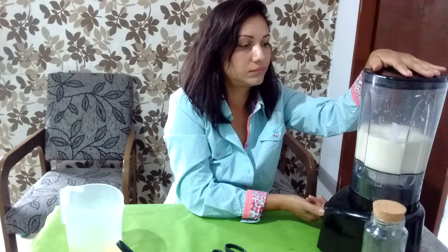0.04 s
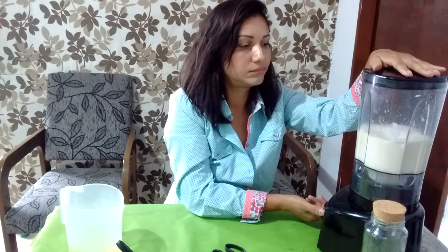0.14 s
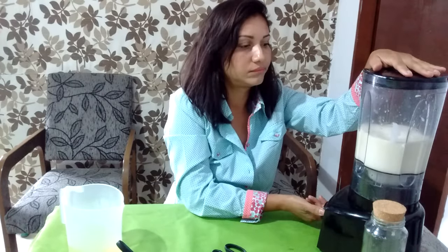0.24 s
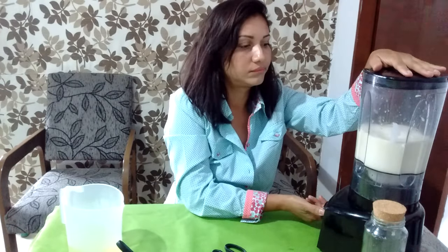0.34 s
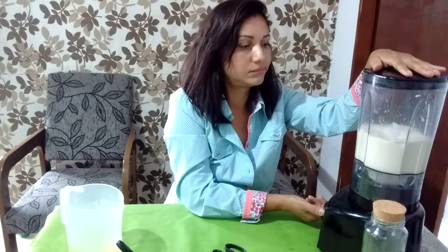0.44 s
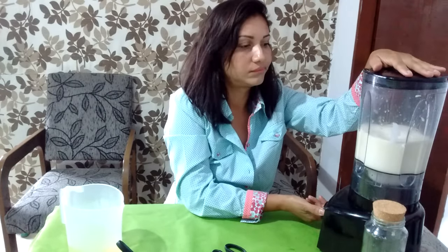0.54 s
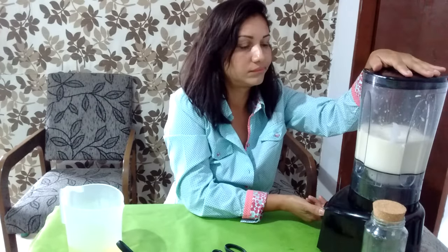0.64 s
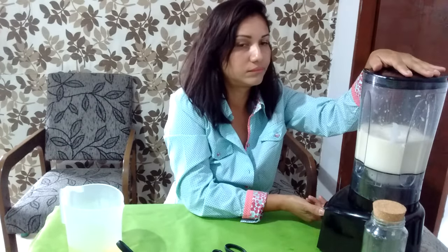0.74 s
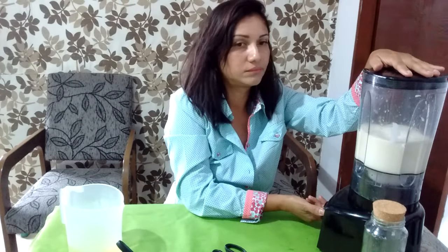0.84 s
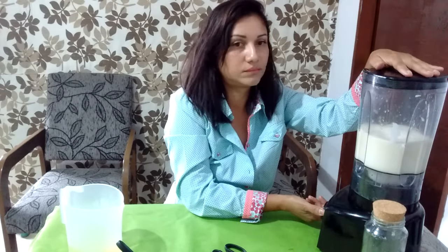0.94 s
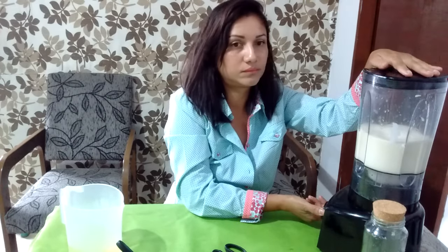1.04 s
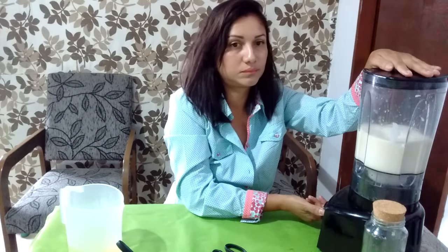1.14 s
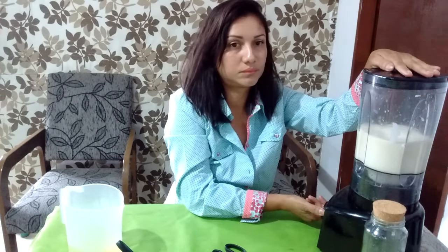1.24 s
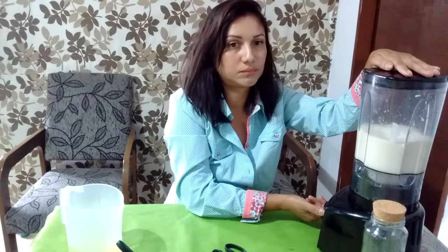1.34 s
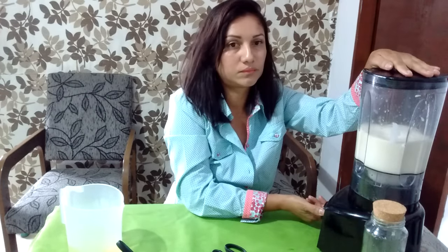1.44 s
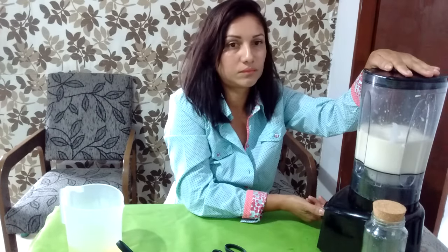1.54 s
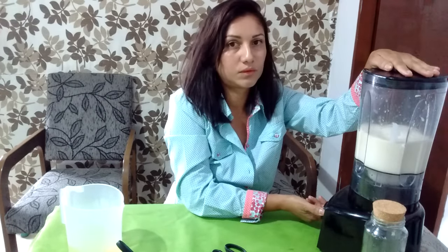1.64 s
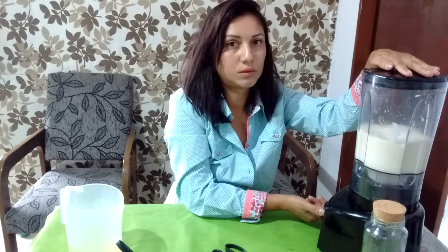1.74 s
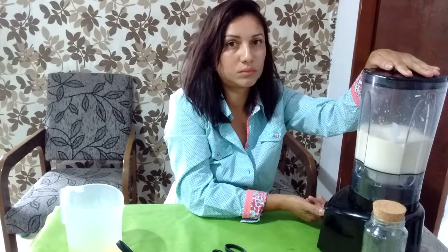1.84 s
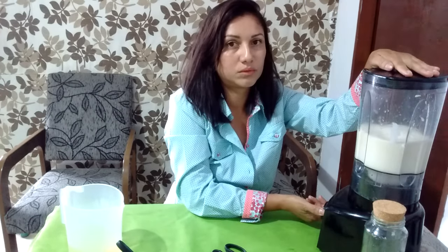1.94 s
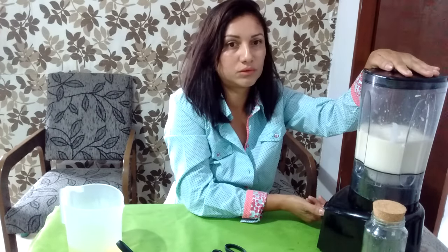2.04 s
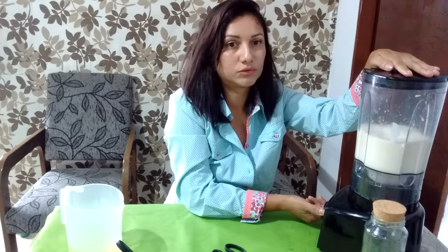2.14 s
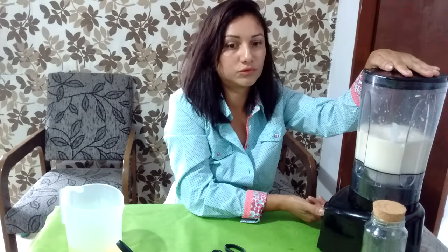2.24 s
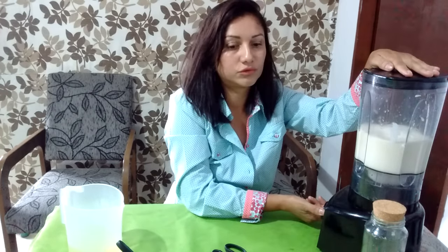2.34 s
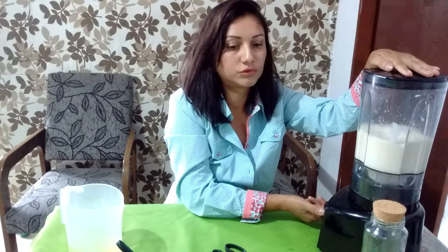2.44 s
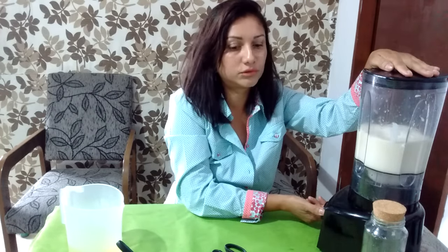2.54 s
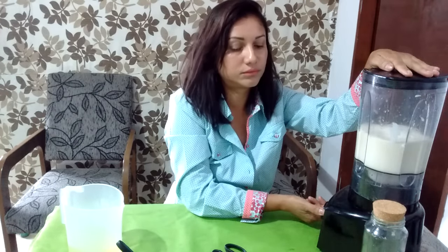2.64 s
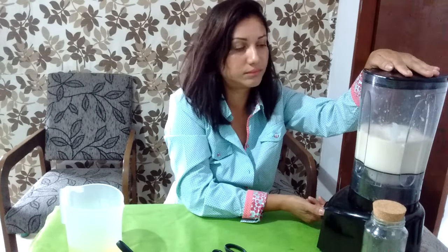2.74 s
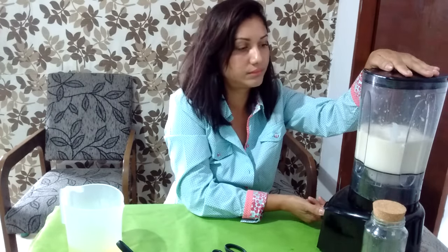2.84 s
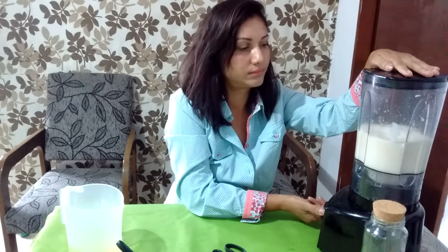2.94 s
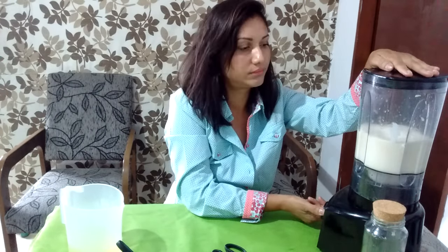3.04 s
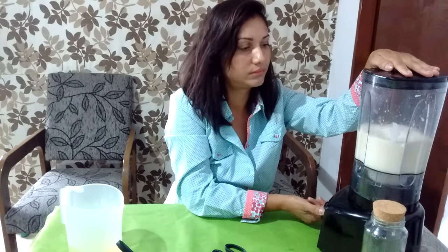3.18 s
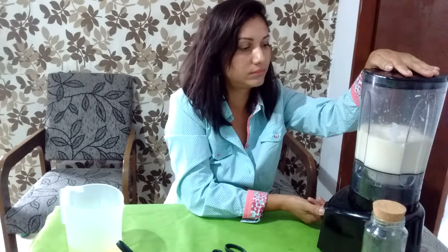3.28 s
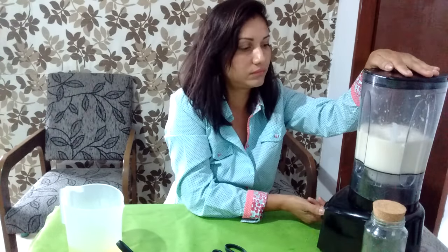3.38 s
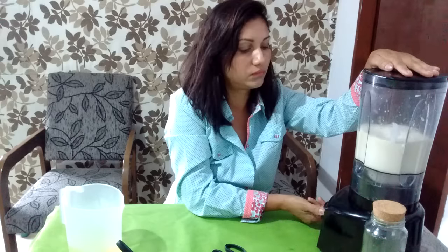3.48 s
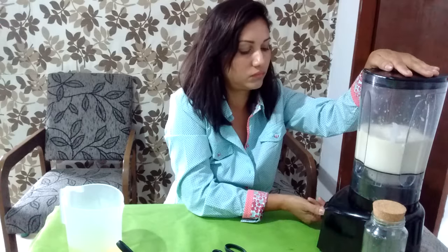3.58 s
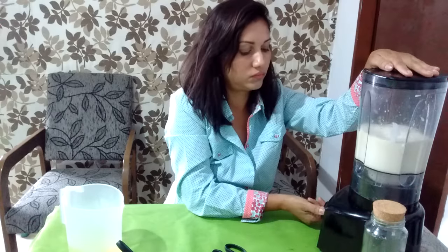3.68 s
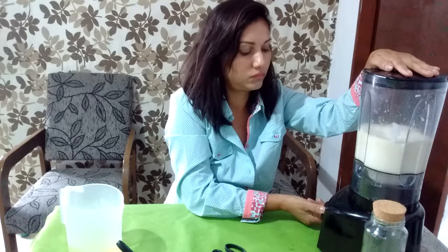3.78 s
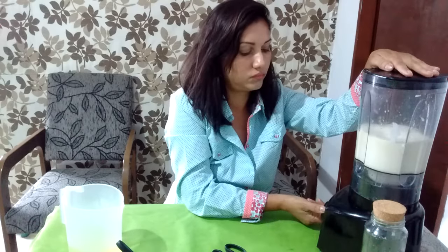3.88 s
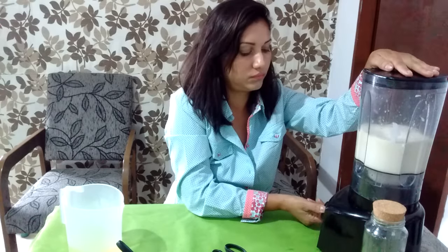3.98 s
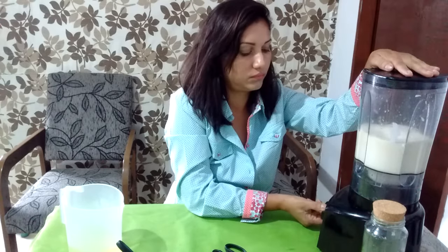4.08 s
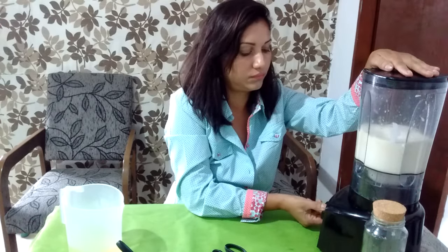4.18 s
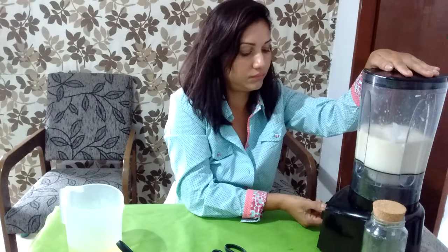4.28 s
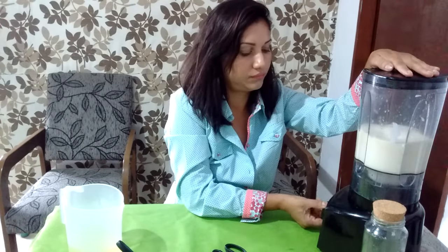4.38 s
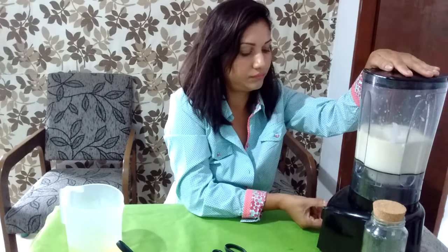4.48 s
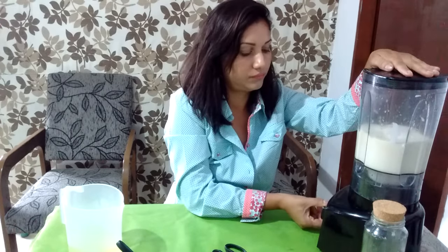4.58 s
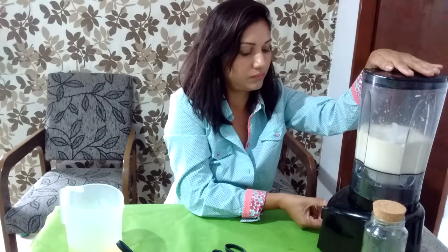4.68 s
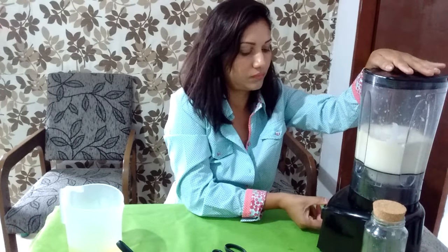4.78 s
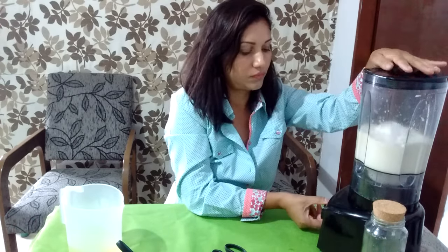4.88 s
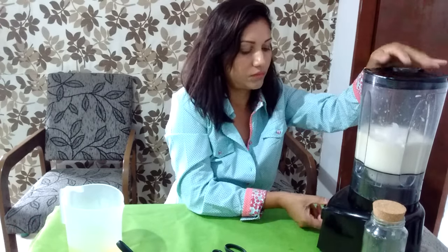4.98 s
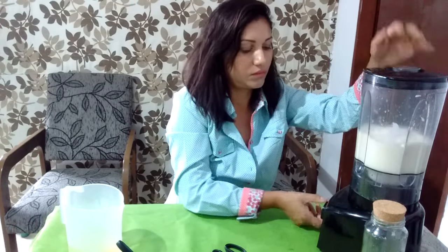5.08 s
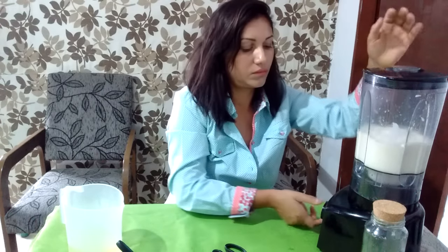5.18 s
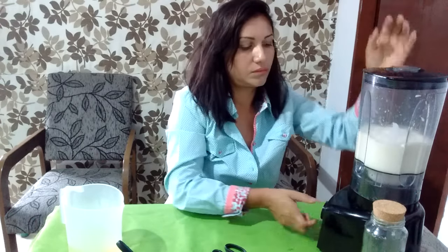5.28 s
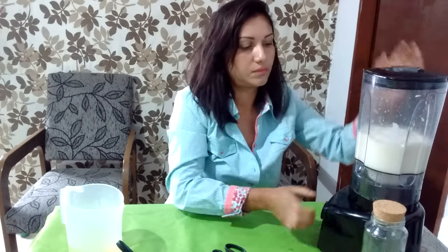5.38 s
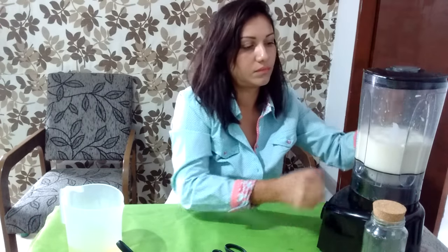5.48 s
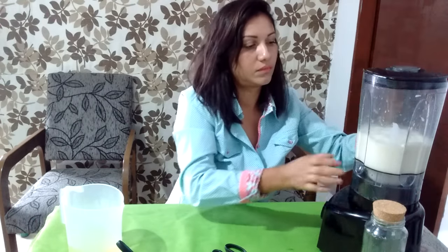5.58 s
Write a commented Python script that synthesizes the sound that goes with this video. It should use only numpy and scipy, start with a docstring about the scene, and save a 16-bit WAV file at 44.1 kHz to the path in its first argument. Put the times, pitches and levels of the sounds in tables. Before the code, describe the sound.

A kitchen blender churns thick liquid in a steady roar, then its dial clacks down and the motor winds to a stop.

```python
"""A kitchen table with a blender churning a thick drink, taken through two microphone ports of opposite polarity.
The blender is shaped noise beating once a turn, plus unsteady sines for shaft, bearing and mains hum.
Its dial is clicked down step by step: noise bursts and decaying sines that hard walls answer.
The motor slows; two more close groups of clicks come as it runs out, the last around standstill.
Under it lie steady room air and an uneven low rumble."""
import sys
import numpy as np
from scipy import signal
from scipy.fft import rfft, irfft, next_fast_len
from scipy.io import wavfile
from scipy.ndimage import map_coordinates

SR = 44100
rng = np.random.default_rng(int(sys.argv[2]) if len(sys.argv) > 2 else 0)


def generate_wav(signal):
    """Clip the signal to [-1, 1] and save it as 16-bit WAV at the path in sys.argv[1]."""
    frames = np.transpose(np.atleast_2d(signal))
    scaled = np.clip(frames, -1, 1) * 32767
    pcm = np.round(scaled).astype(np.int16)
    wavfile.write(sys.argv[1], SR, pcm)


N = 247689  # length in samples


def amp(db):
    """Gain of a level in dB."""
    return 10 ** (np.asarray(db) / 20)


def unit(x):
    """Scale to rms 1."""
    return x / np.sqrt(np.mean(x ** 2) + 1e-20)


def along(points, hz):
    """Read (pitch_hz, value) points on a log frequency axis."""
    f, v = np.transpose(points)
    return np.interp(np.log(hz + 1), np.log(f + 1), v)


def curves(rows):
    """One value per sample for each column after the time."""
    s, *columns = np.transpose(rows)
    return [np.interp(np.arange(N) / SR, s, c) for c in columns]


def wobble(rate):
    """A smooth random curve with rate knots a second."""
    knots = rng.standard_normal(int(N * rate / SR) + 4)
    return map_coordinates(knots, [np.arange(N) * rate / SR])


def filtered(x, response):
    """Multiply the spectrum of x by a response of frequency."""
    m = next_fast_len(x.shape[-1] + SR // 4)
    spectrum = rfft(x, m) * response(np.fft.rfftfreq(m, 1 / SR))
    return irfft(spectrum, m)[..., :x.shape[-1]]


# How alike noise is at the two ports: (pitch_hz, correlation)
PORT_LIKENESS = [(100, .995), (1500, .97), (3000, .92), (4800, .95), (6000, .8), (8000, .8), (9500, .5),
                 (10500, .8), (12000, .9)]


def rush(gain, apart, beat):
    """Noise of rms 1 at both ports, its envelope shaped by beat; a larger apart widens the image."""
    def turn(hz):
        return np.arccos(np.clip(along(PORT_LIKENESS, hz) ** apart, 0, 1)) / 2

    noise = beat * rng.standard_normal((2, N))
    mid, side = filtered(noise, lambda hz: gain(hz) * [np.cos(turn(hz)), np.sin(turn(hz))])
    return unit(np.array([mid + side, mid - side]))


def tone(hz, db, flutter_db, blur):
    """A sine whose strength (flutter_db) and phase (blur, radians) are unsteady."""
    phase = 2 * np.pi * np.cumsum(hz) / SR + blur * wobble(25)
    return np.sqrt(2) * amp(db + flutter_db * wobble(12)) * np.sin(phase)


# Air of the quiet room: (pitch_hz, relative level_db per Hz)
AIR_SPECTRUM = [(20, -33), (70, -6), (110, 0.5), (200, -3.5), (350, -19.5), (700, -23.5), (1500, -32),
                (3000, -34.5), (6000, -46), (10000, -43), (15000, -51)]
# Low rumble, growing as the motor stops: (start_s, level_db)
RUMBLE_LEVEL = [(0, -43), (4.4, -42), (4.7, -46), (5, -32), (5.62, -33)]
# Rumble spectrum: (pitch_hz, relative level_db per Hz)
RUMBLE_SPECTRUM = [(15, -20), (30, -7), (55, 5), (90, -9), (200, -30), (400, -90)]
# Rumble unevenness, strong while the motor shakes the table: (start_s, swing_db)
RUMBLE_LUMPS = [(4.4, 8), (4.6, 2.5)]


def room():
    """Steady air noise over a low rumble whose random swings make it lumpy."""
    air = rush(lambda f: amp(along(AIR_SPECTRUM, f)), 1.0, amp(1.16 * wobble(11.0)))
    lumps = amp(curves(RUMBLE_LUMPS)[0] * wobble(12))
    rumble = rush(lambda f: amp(along(RUMBLE_SPECTRUM, f)), 1, lumps)
    return amp(-36.5) * air + amp(curves(RUMBLE_LEVEL)[0]) * rumble


# Time the kitchen takes to die away by 60 dB: (pitch_hz, t60_s)
KITCHEN_DECAY = [(150, 0.24), (500, 0.63), (2000, 0.43), (8000, 0.38)]


def kitchen(x):
    """Hard walls answer with a noise tail in which each frequency dies at its own speed."""
    hz, t, z = signal.stft(rng.standard_normal((2, SR // 2)), SR, nperseg=256)
    z[1] = 1.02 * z[0] + 0.29 * z[1]  # the ports sit close together
    decay = amp(-60 * t / along(KITCHEN_DECAY, hz)[:, None])
    tail = signal.istft(z * decay, SR, nperseg=256)[1]
    delayed = np.pad(x, (250, 0))  # samples
    return signal.fftconvolve(delayed[None], tail / np.linalg.norm(tail[0]), axes=1)


# Dial clicks, and at 4.853 s the housing rocking back after the knock before it: (start_s, snap level_db,
# detent ring pitch_hz, ring t60_s, knock level_db, knock brightness_db per octave, knock t60_s)
DIAL_CLICKS = [(3.794, -24.5, 6240, .03, -21, 5, 0.14), (4.107, -25, 8700, 0.028, -12.5, -3, 0.13),
               (4.388, -21.5, 4430, 0.042, -16, 4, 0.046), (4.495, -23, 5630, 0.015, -12, -3, 0.06),
               (4.814, -24.5, 4380, 0.095, -12.5, -2.5, 0.1), (4.827, -32, 4400, .05, -17.5, -2.5, 0.058),
               (4.853, -45, 4400, .04, -25.5, -6.5, 0.065), (5.026, -41, 4010, .15, -19, 2.5, 0.025),
               (5.033, -53, 2300, .03, -32, 6, 0.031)]
# Crack of a detent: (pitch_hz, relative level_db per Hz)
SNAP_SPECTRUM = [(1500, 0.5), (3000, -11), (4500, 2), (6200, -3), (8000, -2.5), (12000, -18.5),
                 (15500, -37)]
# The hollow housing's answer to a knock, before brightness: (pitch_hz, relative level_db per Hz)
CASE_SPECTRUM = [(100, -20), (220, -7), (280, -12), (340, -1), (410, -12), (545, -3), (680, -7), (812, 0),
                 (920, -11), (1100, -13), (1400, -5), (2000, -10), (2700, -14), (3500, -24), (6000, -60)]
# Housing modes that ring on: (pitch_hz, level_db against the knock before brightness,
#                              longest t60_s, shortened for short knocks)
HOUSING_MODES = [(217, -12, 0.087), (342, -0.5, .1), (609, -17, 0.11), (816, 0, 0.056),
                 (1328, -10.5, 0.069), (1490, -15, 0.07)]


def detent_snap(t, ring_hz, ring_s):
    """A detent lets go: a noise crack, a brief sine and a narrow buzz at the ring pitch."""
    crack = unit(filtered(rng.standard_normal(len(t)), lambda f: amp(along(SNAP_SPECTRUM, f))))
    crack = crack * (.6 * amp(-60 * t / .008) + .6 * amp(-60 * t / .05))
    buzz = unit(filtered(rng.standard_normal(len(t)), lambda f: 1 / (1 + ((f - ring_hz) / 180) ** 2)))
    ping = .8 * amp(-60 * t / .009) * np.sin(2 * np.pi * ring_hz * t)
    return crack + ping + .3 * amp(-60 * t / ring_s) * buzz


def housing_knock(t, tilt_db, t60):
    """The knocked housing rattles on the table: shaped noise with a soft start and a decay."""
    def response(f):
        return amp(along(CASE_SPECTRUM, f) + tilt_db * np.log2(f / 800 + 0.082))

    rattle = unit(filtered(rng.standard_normal(len(t)), response))
    return rattle * (1 - np.exp(-t / (0.043 * t60))) * amp(-60 * t / t60)


def housing_ring(t, tilt_db, t60):
    """The hollow housing rings on in decaying sines."""
    ringing = np.zeros(len(t))
    for hz, db, longest_s in HOUSING_MODES:
        ring_s = longest_s * min(t60 / .08, 1)
        envelope = amp(db + tilt_db * np.log2(hz / 1600) - 60 * t / ring_s)
        rise = 1 - np.exp(-t * hz / 3.5)
        ringing += envelope * rise * np.sin(2 * np.pi * hz * t)
    return ringing


def dial():
    """Each detent snaps, rings briefly and knocks the hollow housing, and the kitchen answers; one row is
    instead the housing rocking back after a knock, with only a faint snap."""
    out = np.zeros((2, N + 2 * SR))
    t = np.arange(SR // 4) / SR
    for start_s, snap_db, ring_hz, ring_s, knock_db, tilt_db, t60 in DIAL_CLICKS:
        snap = amp(snap_db) * detent_snap(t, ring_hz, ring_s)
        hit = snap + amp(knock_db) * housing_knock(t, tilt_db, t60)
        # the nearest wall sends one clear echo after 10.5 ms
        hit = hit + 0.2 * np.pad(hit, (round(.0105 * SR), 0))[:len(t)]
        hit = hit + amp(knock_db) * housing_ring(t, tilt_db, t60)
        heard = amp(-8.5) * kitchen(hit)
        heard[:, :len(t)] += hit
        out[:, round(start_s * SR):][:, :heard.shape[1]] += heard
    return out[:, :N]


def after_clicks(rows, drop_s):
    """What is lost click by click: a quick drop, then a steady slope up to the next click."""
    t = np.arange(N) / SR
    starts = [row[0] for row in DIAL_CLICKS[:len(rows)]]
    ends = starts[1:] + [N / SR]
    return sum(drop * np.clip((t - a) / drop_s, 0, 1) + slope * np.clip(t - a, 0, b - a)
               for (drop, slope), a, b in zip(rows, starts, ends))


# Shaft speed as the load wanders, before the losses below: (start_s, speed in turns per s)
SHAFT_SPEED = [(0.05, 134.5), (0.42, 137.5), (0.6, 134.8), (0.85, 137.4), (1.07, 136.2), (1.2, 137.4),
               (1.65, 138.3), (2.14, 136.5), (2.45, 136.6), (2.7, 138.6), (3.07, 134.6), (3.4, 139.8),
               (3.76, 135)]
# Speed lost after each of the first clicks: (quick drop in turns per s, slope in turns per s each s)
SPEED_LOSS = [(7.5, 17), (5, 33), (0, 90), (0, 190)]
# Levels as the load shifts, before the losses below: (start_s, roar level_db, whine level_db)
LOAD_LEVELS = [(0, -17.5, -39), (0.17, -17.5, -38), (0.4, -19.5, -34.5), (0.55, -17, -31.5),
               (0.7, -17, -36.5), (1.0, -18, -37.5), (1.3, -18, -35), (1.6, -19, -35.5), (1.8, -17.5, -34),
               (2.1, -17.5, -35.5), (2.4, -19.5, -36), (2.75, -17.5, -35.5), (3.15, -18.5, -35),
               (3.5, -17, -34.5), (3.75, -18, -36), (3.95, -19, -31), (4.2, -20, -35.5)]
# Roar and whine level lost after the same clicks, negative is a gain: (quick drop_db, slope_db per s)
LEVEL_LOSS = [(0.25, -5), (1.1, -8), (4.5, -2), (-2, 73)]
SETTLE_S, HUSH_S = 0.03, 0.06  # time a quick drop takes, in speed and in level
SURGE_DB, WAVER_DB, SURGES_PER_S = 0.29, 0.7, 8.05  # chance swells of roar and whine, knots per s
WHINE_OFF_DB = 8  # the whine's extra loss at switch-off


def motor():
    """Shaft speed and the levels of roar and whine as the dial is clicked down."""
    turns = np.maximum(curves(SHAFT_SPEED)[0] - after_clicks(SPEED_LOSS, SETTLE_S), 0)
    roar_db, whine_db = curves(LOAD_LEVELS) - after_clicks(LEVEL_LOSS, HUSH_S)
    off = np.clip((np.arange(N) / SR - DIAL_CLICKS[2][0]) / HUSH_S, 0, 1)
    roar_db = roar_db + SURGE_DB * wobble(SURGES_PER_S)
    whine_db = whine_db - WHINE_OFF_DB * off + WAVER_DB * wobble(SURGES_PER_S)
    return turns, roar_db, whine_db


# Brushes, fan and churning liquid: (pitch_hz, relative level_db per Hz)
ROAR_SPECTRUM = [(20, -45), (60, -13), (100, -0.5), (200, 1.5), (350, -7.5), (600, -1.5), (1000, -1.5),
                 (1500, -7.5), (2000, -12), (3200, -14.5), (4500, -23), (6500, -29), (9500, -29.5),
                 (11000, -52), (11800, -39), (12500, -43), (13300, -42), (14200, -60), (15500, -64)]
# Peaks and dips of jug and housing in the roar: (pitch_hz, width_hz, height_db)
BODY_PEAKS = [(93, 19, -1.5), (185, 32, -4.5), (256, 97, 8.5), (291, 32, -8.5), (354, 62, 7),
              (519, 16.4, -17), (555, 84, 1), (641, 19.5, -14), (821, 17, 6.5), (959, 6.5, -16),
              (1018, 65, 2.5), (1146, 18, 5), (1316, 19.3, 14), (1408, 25, 7.5), (1410, 130, 2),
              (1497, 25, 5.5), (1641, 47, 6.5), (2325, 23, 8), (3400, 550, -4.5), (4165, 56, 5),
              (4880, 41, 4.5), (8040, 67, 10), (9120, 78, -19)]


def churning_roar(turns, roar_db):
    """Noise in the body's resonances, beating once a turn."""
    def response(f):
        peaks_db = sum(db / (1 + (2 * (f - centre) / width) ** 2) for centre, width, db in BODY_PEAKS)
        return amp(along(ROAR_SPECTRUM, f) + peaks_db)

    angle = 2 * np.pi * np.cumsum(turns) / SR
    # lumps hit the blades unevenly: short bursts shared by all bands
    lumps = amp(0.63 * wobble(90) + 0.85 * wobble(9))
    return amp(roar_db) * rush(response, .85, (1 + 0.065 * np.cos(angle)) * lumps)


# How well shaft and bearing tones radiate: (pitch_hz, gain_db)
RADIATION = [(60, -30), (105, -5), (121, 0), (132, 1), (140, 1), (300, 0), (362, 10.5), (400, 4), (450, -1),
             (490, 11), (525, 9), (548, 12), (570, 8), (595, 12), (620, 6), (670, 5), (705, 13), (735, 13),
             (780, 11), (880, 2)]
# Unbalance and blades: (multiple of shaft speed, level_db before load, swells and radiation)
SHAFT_TONES = [(1, -28), (2, -36), (3, -41), (4, -43), (5, -46), (6, -47)]
# The once-a-turn throb swells and sinks, only the distance from the mean counts: (start_s, level_db)
THROB_SWELLS = [(0.0, -44), (0.22, -40.5), (0.33, -52), (0.63, -37.5), (0.76, -49), (0.78, -44),
                (1.56, -48), (2.44, -42), (2.49, -57), (2.52, -47.5), (3.14, -38), (3.28, -50),
                (3.85, -37.5), (4.45, -53)]


def shaft_tones(turns, load_db):
    """Unbalance and blades push at whole multiples of the shaft speed."""
    throb_db = curves(THROB_SWELLS)[0] - np.mean(THROB_SWELLS, axis=0)[1]
    total = 0
    for multiple, db in SHAFT_TONES:
        hz = multiple * turns
        swell_db = throb_db if multiple == 1 else 1.5 * wobble(5)
        total = total + tone(hz, load_db + db + swell_db + along(RADIATION, hz), 1.6, .2)
    return total


# Ball pass and its shaft sidebands: (multiple of shaft speed, level_db against the whine level)
BEARING_TONES = [(3.28, 0), (4.28, -5), (5.28, 0), (6.28, -11)]
# The third bearing tone swells on its own: (start_s, swell_db)
PURE_SWELLS = [(0, -8), (0.05, 3), (0.28, 2), (0.36, -7), (0.6, -10), (0.66, 4), (0.73, -3), (0.9, 1),
               (1.6, 0), (1.9, 1), (2.2, 0), (2.45, 2), (2.85, -1), (2.93, 2), (3.03, -4), (3.3, 2),
               (3.46, -5), (3.6, 0), (3.78, 3), (3.83, -6), (4.0, -5), (4.1, -6), (4.22, -3), (4.31, -7),
               (4.39, -2)]
RUNDOWN_BLUR = .25  # extra phase unsteadiness (radians) from the first dial click on


def bearing_whine(turns, whine_db):
    """Balls pass at a fractional multiple of the shaft speed; each tone comes and goes by itself."""
    rundown = np.clip((np.arange(N) / SR - DIAL_CLICKS[0][0]) / HUSH_S, 0, 1)
    blur = .2 + RUNDOWN_BLUR * rundown
    swells_db = [2 * wobble(6), 1.5 * wobble(6), curves(PURE_SWELLS)[0], 2 * wobble(6)]
    total = 0
    for (multiple, db), swell_db in zip(BEARING_TONES, swells_db):
        hz = multiple * turns
        total = total + tone(hz, whine_db + db + swell_db + along(RADIATION, hz), 1.5, blur)
    return total


# Magnetic hum while the motor is powered: (pitch_hz, level_db)
HUM_TONES = [(120, -37), (240, -29)]


def mains_hum():
    """Steady-pitched magnetic hum; the field collapses at switch-off."""
    powered_db = np.interp(np.arange(N) / SR, [4.39, 4.6], [0, -60])
    return sum(tone(np.full(N, hz), db + powered_db, 1.9, 0.66) for hz, db in HUM_TONES)


def blender():
    """One motor drives the roar, shaft tones and bearing whine; mains hum joins them."""
    turns, roar_db, whine_db = motor()
    load_db = roar_db - LOAD_LEVELS[0][1]
    roar = churning_roar(turns, roar_db)
    return roar + shaft_tones(turns, load_db) + bearing_whine(turns, whine_db) + mains_hum()


def scene():
    """Room, dial and blender together."""
    return room() + dial() + blender()


# Port colour: (pitch_hz, left over right level_db)
LEFT_OVER_RIGHT = [(140, .9), (215, 2.3), (430, 2.5), (1000, .3), (1500, -1.5), (6200, -1.5), (7500, -5.3),
                   (10000, -5.5), (11000, -.3)]
# The left port hears later: (pitch_hz, lag_s)
LEFT_LAG = [(200, 2.15e-4), (430, 2.7e-4), (1000, 3.04e-4), (4300, 3.22e-4), (8600, 3.05e-4), (15000, 3e-4)]
TOP_HZ = 15600  # nothing passes above


def record(dry):
    """The left port is reversed, later and differently coloured; peaks are rounded and the top cut."""
    side = np.array([[1], [-1]])  # left, right

    def ports(f):
        colour = amp(side * along(LEFT_OVER_RIGHT, f) / 2)
        return -side * colour * np.exp(-1j * np.pi * side * f * along(LEFT_LAG, f))

    heard = filtered(dry, ports)
    rounded = heard / (1 + np.abs(heard / .8) ** 4) ** (1 / 4)
    return filtered(rounded, lambda hz: hz < TOP_HZ)


dry = scene()
out = record(dry)
generate_wav(out)
```